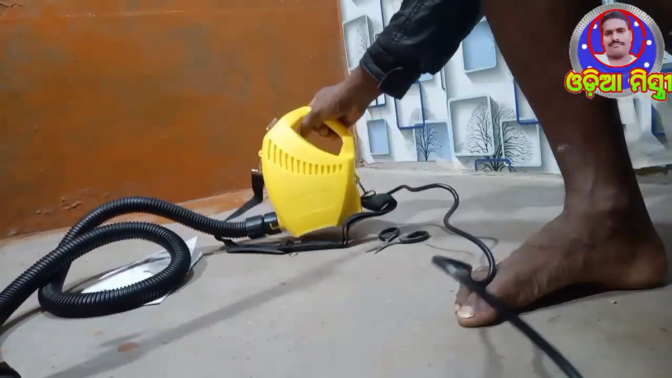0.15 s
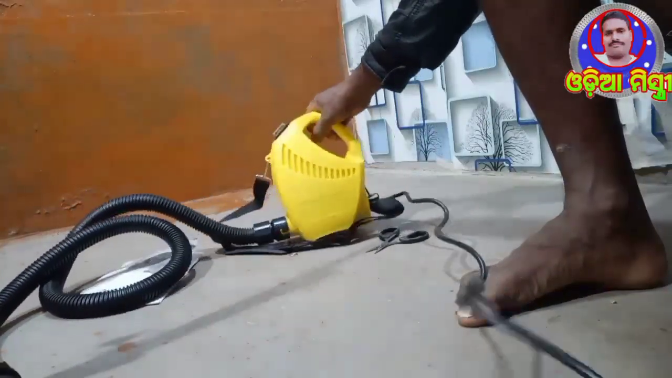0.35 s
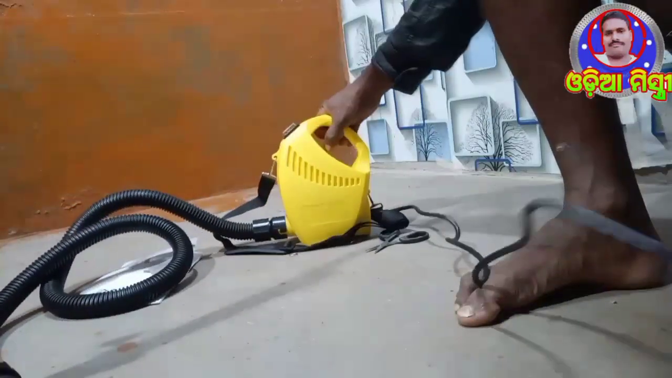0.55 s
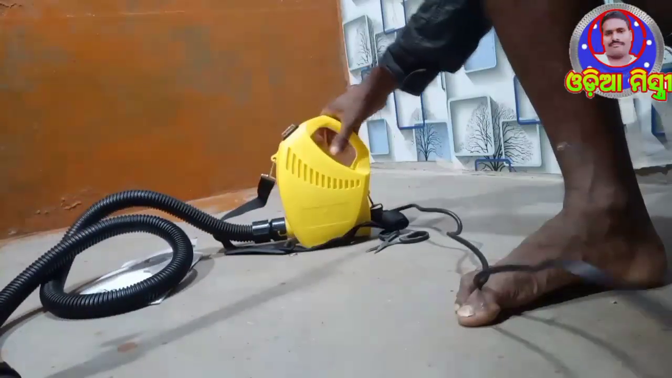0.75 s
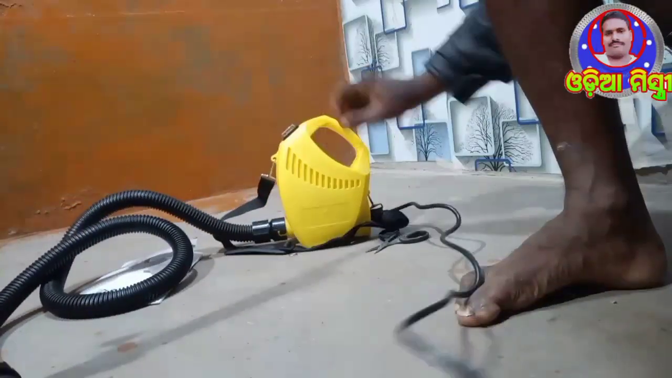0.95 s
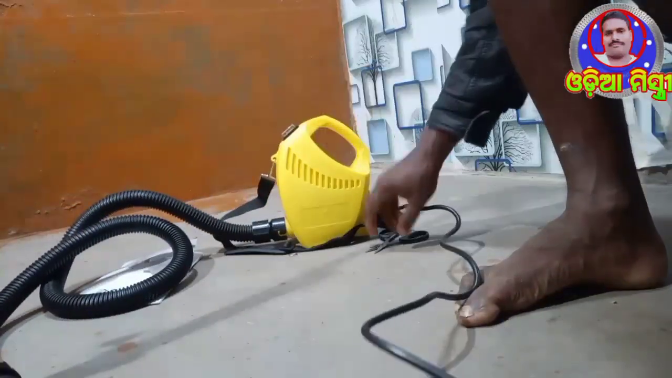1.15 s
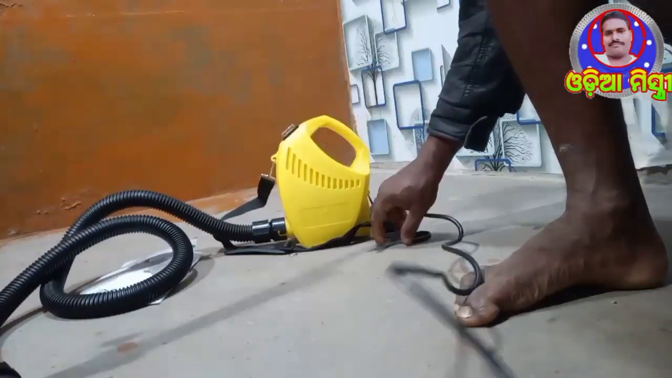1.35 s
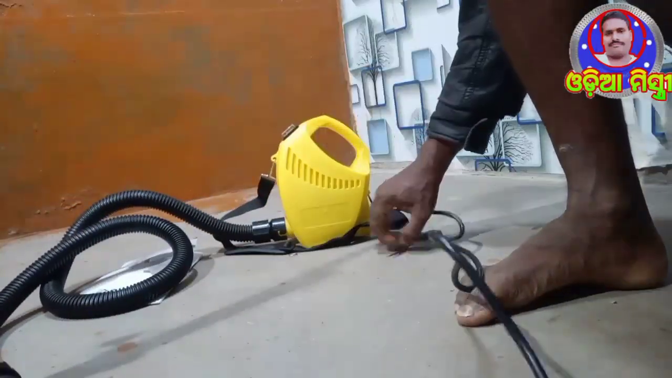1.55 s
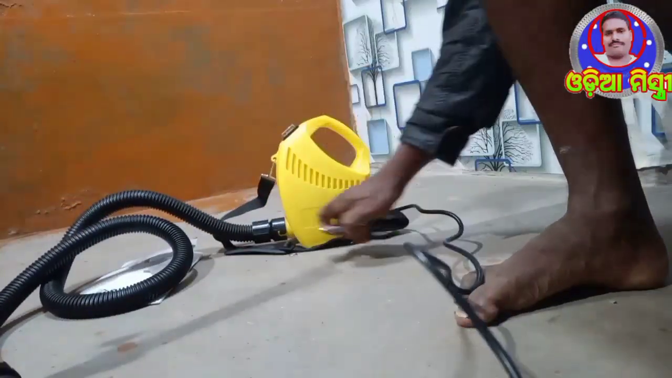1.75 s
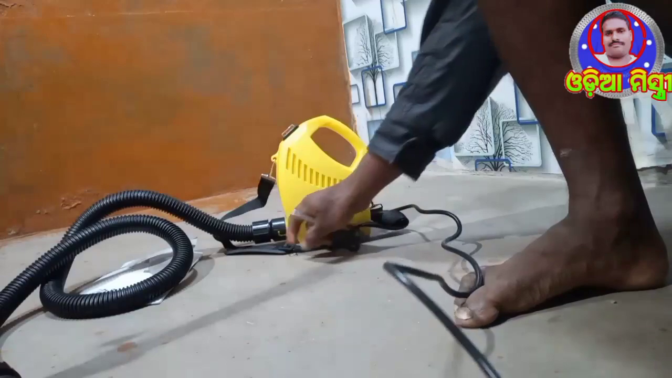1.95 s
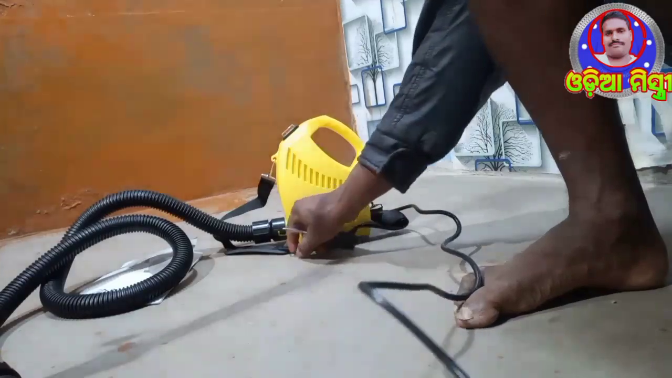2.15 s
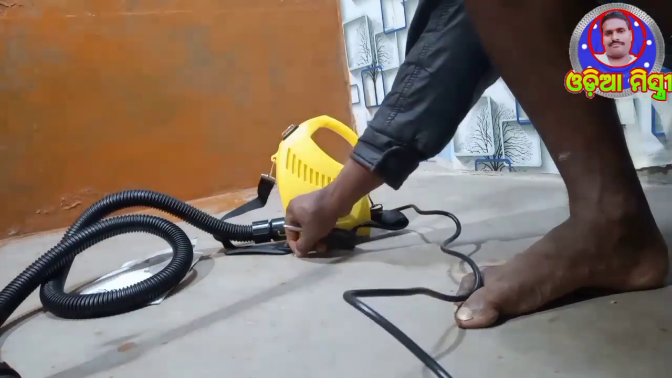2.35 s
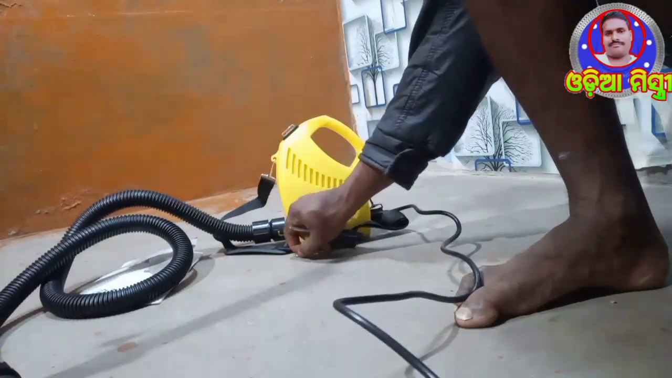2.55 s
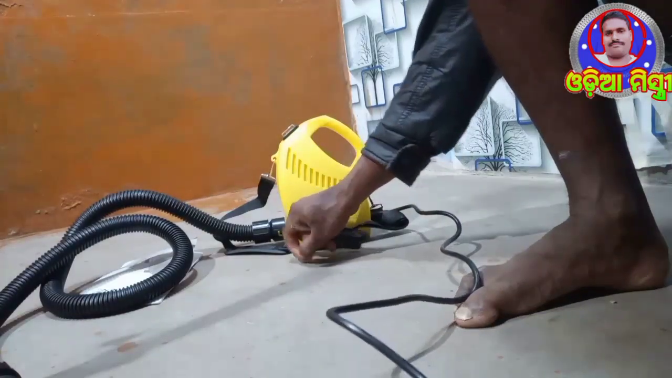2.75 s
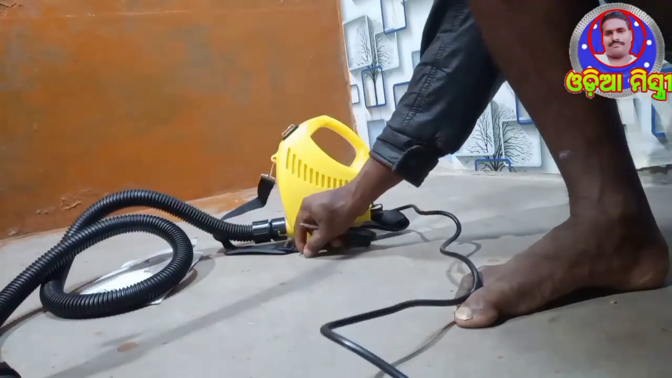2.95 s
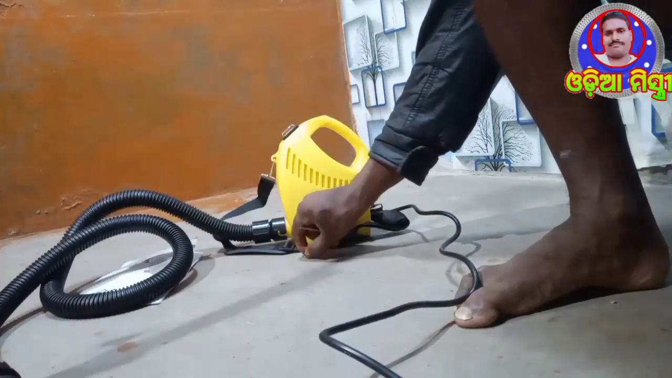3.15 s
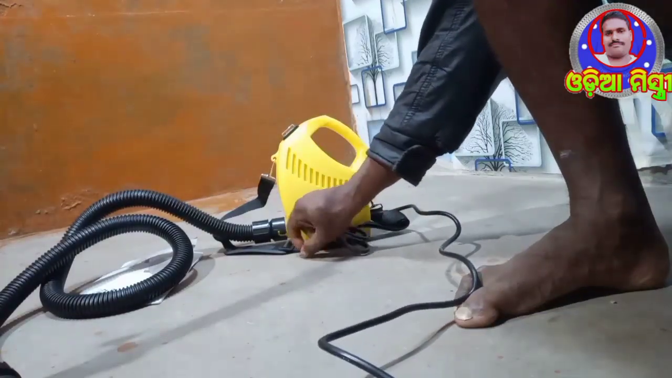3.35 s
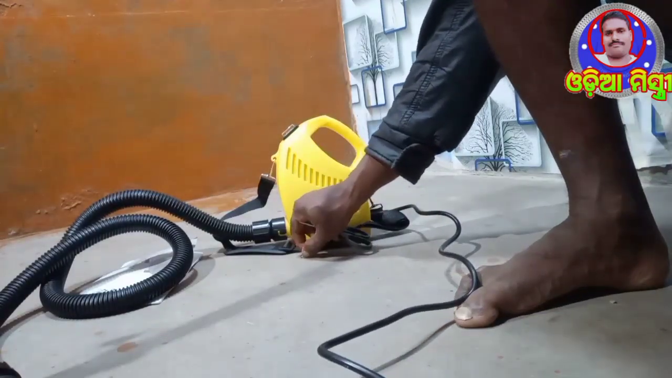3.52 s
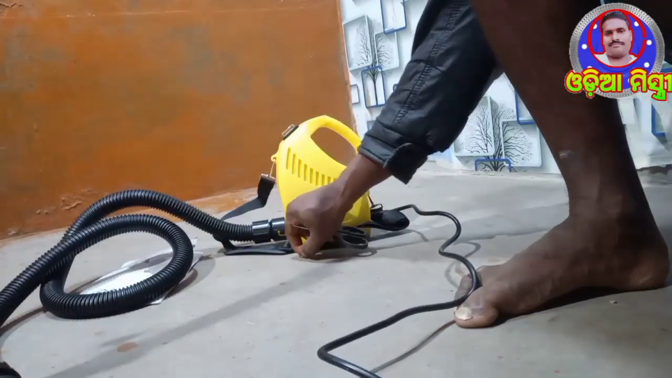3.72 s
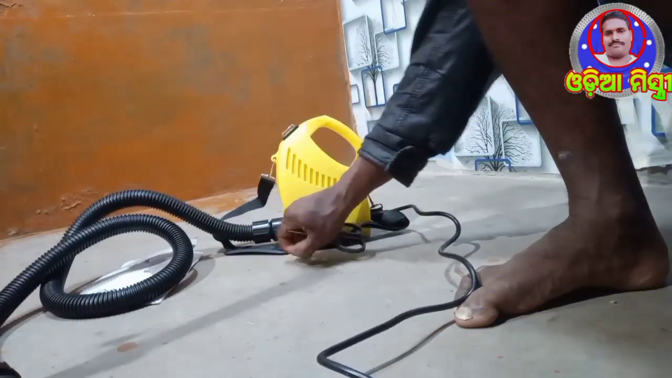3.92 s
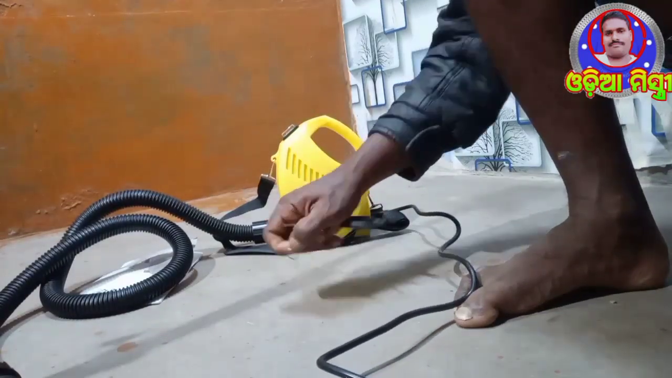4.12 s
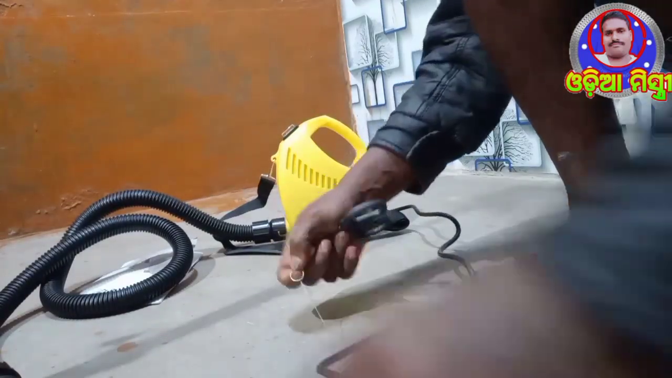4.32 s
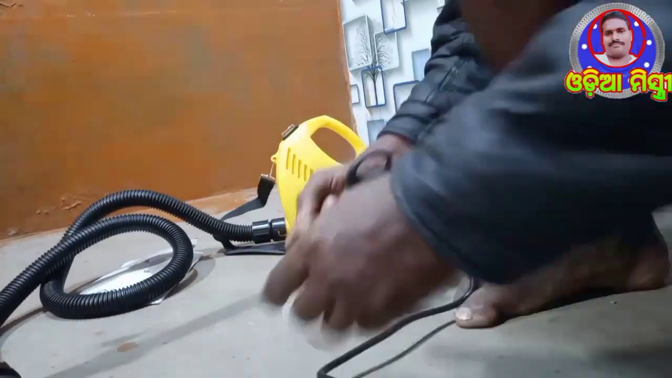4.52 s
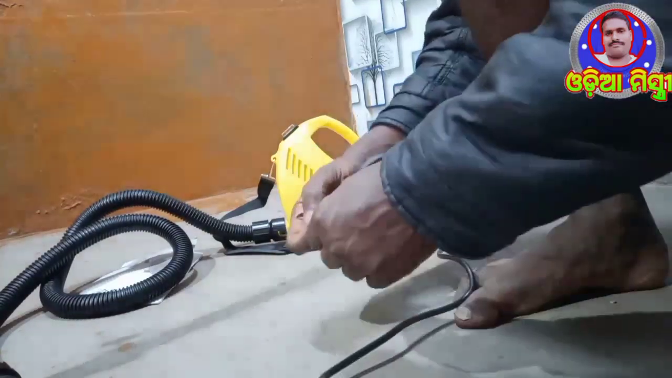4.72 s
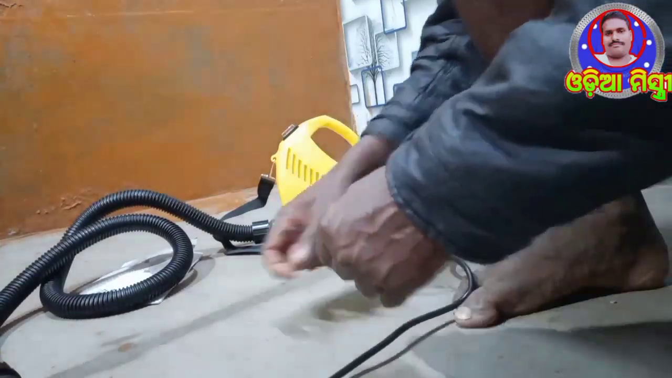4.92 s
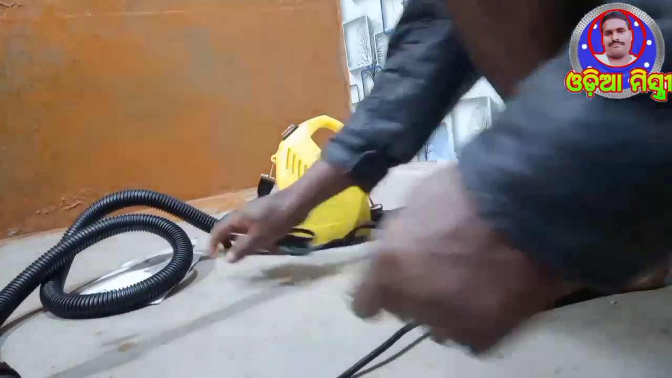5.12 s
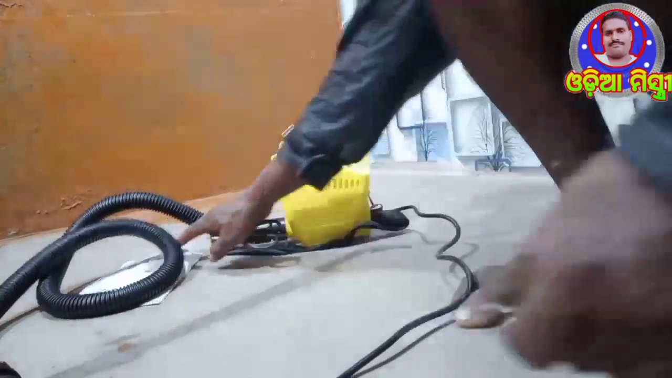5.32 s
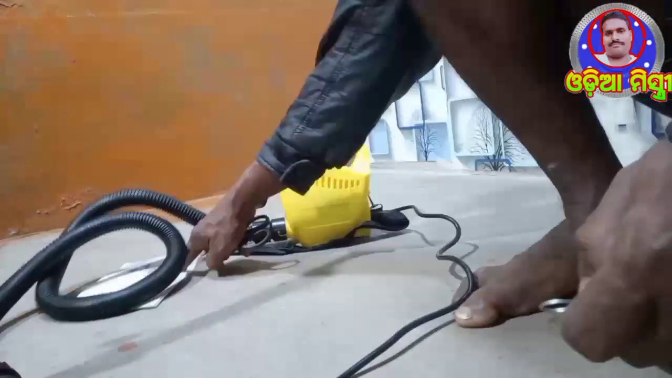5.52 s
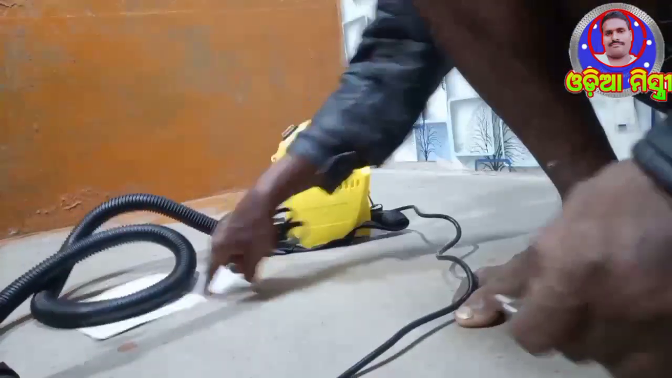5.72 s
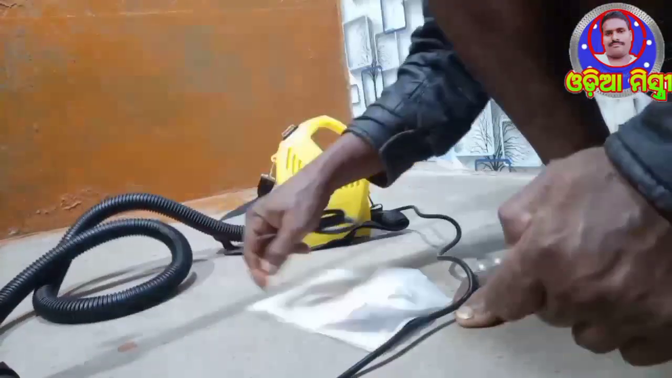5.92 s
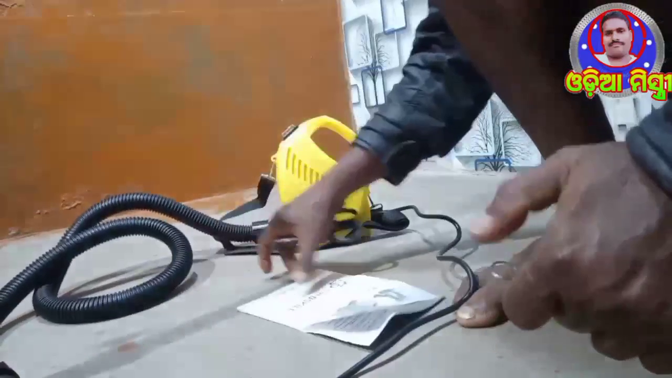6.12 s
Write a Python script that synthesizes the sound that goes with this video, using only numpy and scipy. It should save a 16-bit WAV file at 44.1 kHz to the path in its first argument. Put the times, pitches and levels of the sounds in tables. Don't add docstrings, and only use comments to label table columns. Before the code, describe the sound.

Close on the floor of a quiet, hard-walled room, a hollow plastic body lands with a loud slap and low ring, rocks once and skids briefly. Faint cable rubbing and small ticks follow. A part snaps loose with a sharp clattering click, sleeves rustle softly, and finally a sheet of paper slides under a palm with raspy hiss and soft thumps. Phone microphone, light room noise.

```python
import sys
import numpy as np
from scipy import signal
from scipy.io import wavfile
from scipy.ndimage import uniform_filter1d

SR = 44100
rng = np.random.default_rng(int(sys.argv[2]) if len(sys.argv) > 2 else 0)


def elevation(decibels):
    levels = np.asarray(decibels, float)
    return 10 ** (levels / 20)


def master(y):
    cut = np.clip(np.atleast_2d(y).T, -1, 1)
    pcm = np.round(cut * 32767)
    wavfile.write(sys.argv[1], SR, pcm.astype(np.int16))


N = 276507


def evened(x):
    return x / np.sqrt(np.mean(x ** 2) + 1e-20)


def read(points, hz):
    f, value = np.transpose(points)
    return np.interp(np.log(hz + 1), np.log(f + 1), value)


def along(rows):
    s, *columns = np.transpose(rows)
    return [np.interp(np.arange(N) / SR, s, c) for c in columns]


def during(rows):
    t = np.arange(N) / SR
    return elevation(np.array(along(rows))) * (t >= rows[0][0]) * (t <= rows[-1][0])


def add(mix, s, sound):
    part = mix[round(s * SR):][:len(sound)]
    part += sound[:len(part)]


def causal(points, size=2048):
    log_gain = np.log(elevation(read(points, abs(np.fft.fftfreq(2 * size, 1 / SR)))))
    return np.fft.ifft(np.exp(np.conj(signal.hilbert(log_gain)))).real[:size]


def coloured(x, points):
    return signal.oaconvolve(x, causal(points))[:len(x)]


def resonate(x, hz, width_hz):
    r = np.exp(-np.pi * width_hz / SR)
    return signal.lfilter([1 - r * r, 0, r * r - 1], [1, -2 * r * np.cos(2 * np.pi * hz / SR), r * r], x) / 2


def follow(x, hz, width_hz):
    turn = np.exp(2j * np.pi * np.cumsum(hz) / SR)
    r = np.exp(-np.pi * width_hz / SR)
    return 2 * (turn * signal.lfilter([1 - r], [1, -r], x / turn)).real


def swell(u, rise, fall):
    return -10 * np.where(u < 0, -u / np.maximum(rise, 1e-3), u / np.maximum(fall, 1e-3))


def strokes(rows, extra_db=0):
    s, db, rise, fall = np.transpose(rows)[:4, :, None]
    at = np.arange(0, N + 64, 64)
    level_db = db + extra_db + swell(at / SR - s, rise, fall)
    return np.interp(np.arange(N), at, np.linalg.norm(elevation(level_db), axis=0))


def dying_tones(rows):
    t, out = np.arange(2 * SR // 3) / SR, np.zeros(N)
    for s, db, hz, t60 in rows:
        onset = 1 - np.exp(-t * hz / 0.19)
        add(out, s, elevation(db - 60 * t / t60) * np.sin(2 * np.pi * hz * t) * onset)
    return out


# f/Hz, density/dB per Hz
AIR = [(29, -47), (50, -16.5), (108, -4.5), (154, 0.5), (592, -10.5), (735, -10), (1220, -18.5),
       (2620, -15), (3950, -16.5), (4900, -32), (6380, -33), (9140, -34), (15500, -38.5)]
# peak t/s, peak level/dB, rise/s, fall/s
SHUDDERS = [(0.0, -73, 0.088, 0.13), (.5, -55, 0.025, 0.2), (.63, -58, 0.12, 0.096), (.77, -64.5, .08, .03),
            (1.17, -77, .04, .05), (.98, -70, 0.094, 0.15), (1.66, -75.5, 0.056, 0.085),
            (2.06, -80.5, 0.055, 0.071), (2.46, -76.5, 0.098, 0.093), (3.05, -67, 0.22, 0.065),
            (3.28, -76, .07, 0.37), (4.42, -74.5, 0.36, 0.38), (5.55, -65.5, 0.15, 0.34),
            (6.03, -53.5, 0.11, 0.11)]


def air():
    hush = coloured(rng.standard_normal(N), AIR)
    drone = resonate(resonate(rng.standard_normal(N), 73, 11), 73, 13)
    return elevation(-73.5) * evened(hush) + (elevation(-99) + strokes(SHUDDERS)) * evened(drone)


# f/Hz, t60/s
WALLS = [(120, 0.85), (330, 0.63), (870, 0.28), (2300, 0.31), (5000, 0.08), (9000, 0.14), (15000, 0.062)]


def room(x):
    taps = np.zeros(SR)
    at = np.arange(200, SR - 20, 20)
    taps[at + rng.integers(0, 20, len(at))] = rng.choice([-1., 1.], len(at))
    hz, t, z = signal.stft(taps, SR, nperseg=512)
    decay = elevation(-60 * t / read(WALLS, hz)[:, None])
    tail = signal.istft(z * decay, SR, nperseg=512)[1][200:]
    delayed = np.pad(tail / np.linalg.norm(tail), (120, 0))
    return signal.fftconvolve(x, delayed)[:N]


# f/Hz, gain/dB
MIC = [(30, -43.5), (95, -22), (150, 4), (1200, 7), (3500, 1), (4300, -4), (5800, -5.5), (7500, -6.5),
       (9200, -0.5), (11000, -11), (15000, -16.5)]


def heard(x):
    return coloured(x, MIC)


def puff():
    out, u = np.zeros(N), np.arange(SR // 8) / SR / 0.0065
    add(out, 0.441, elevation(-40) * u * (2 - u) * np.exp(-u))
    return out


# t/s, upper tone level/dB, lower tone level/dB
SING = [
    (4.898, -100, -97.5),
    (4.93, -87.5, -72),
    (4.97, -87, -76.5),
    (5.004, -66.5, -78.5),
    (5.032, -83, -70),
    (5.058, -67, -96),
    (5.104, -84, -82),
    (5.138, -74.5, -81.5),
    (5.17, -94.5, -92),
]


def singing():
    t = np.arange(N) / SR
    on = (t > SING[0][0]) & (t < SING[-1][0])
    waver = 1 + 0.002 * evened(uniform_filter1d(rng.standard_normal((2, N)), size=1500))
    out = np.zeros(N)
    for db, hz, w in zip(along(SING), (1070, 430), waver):
        out += elevation(db + 6) * on * np.sin(2 * np.pi * hz * np.cumsum(w) / SR)
    return out


# t/s, peak level/dB, f/Hz, t60/s
BUMPS = [(2.987, -39, 370, 0.035), (4.232, -60.5, 145, 0.083), (5.457, -41, 170.6, 0.11),
         (5.534, -40.5, 160.3, 0.11), (5.596, -46, 165, 0.067), (5.665, -40.5, 164, 0.056),
         (5.715, -41.5, 175, 0.083), (5.825, -45, 175, .12), (5.86, -41, 180, 0.16),
         (5.775, -37, 175, 0.088), (5.919, -49, 165, 0.088), (6.066, -46, 149, .12),
         (6.155, -40, 148, 0.14), (6.215, -51, 160, .12)]


def bumps():
    return dying_tones(BUMPS)


# t/s, peak level/dB, f/Hz, t60/s
PINGS = [(.02, -67, 773, 0.18), (.165, -62.5, 746.5, 0.1), (1.384, -79, 1067, 0.36),
         (1.885, -70.5, 792, 0.27), (2.69, -49.5, 2400, 0.05), (2.69, -54.5, 3800, 0.067),
         (2.81, -54, 7100, 0.12), (3.2, -68, 1088, 0.35), (3.417, -69, 9090, 0.088),
         (4.25, -69.5, 770, 0.28), (5.022, -62.5, 2400, 0.053), (5.05, -70, 2340, .06),
         (5.019, -70.5, 2550, 0.06), (5.021, -70, 1890, 0.051), (6.156, -26, 3350, 0.026),
         (6.163, -16, 2850, 0.0079), (0.894, -48, 2960, 0.19), (.908, -50.5, 2335, 0.15),
         (2.988, -55, 124.8, 0.47), (.445, -26.5, 513, .24), (.444, -32, 667, .2), (0.72, -48.5, 269, 1.24),
         (.75, -39.5, 244, 0.16), (.82, -44, 420, 0.57), (.749, -43, 1430, 0.2), (.749, -45, 1306, 0.18),
         (.749, -43, 768, 0.22), (.749, -48, 1162, 0.22), (.75, -40.5, 330, 0.31), (2.495, -68, 2900, .08),
         (2.8, -56, 3300, .1), (2.1, -60, 2700, .08), (.75, -27.5, 318, .12), (.815, -37, 330, 0.089),
         (0.751, -44, 1080, 0.18), (2.69, -65, 4000, .1)]


def pings():
    return dying_tones(PINGS)


def patches(x, patchy_db):
    _, _, z = signal.stft(x, nperseg=256)
    field = uniform_filter1d(rng.standard_normal(z.shape), size=4, axis=0)
    field = uniform_filter1d(field, size=10, axis=1)
    return signal.istft(z * elevation(patchy_db * evened(field)), nperseg=256)[1][:N]


def stick_slip():
    slips = elevation(4.0 * np.minimum(rng.exponential(1, N), 2.6)) * rng.standard_normal(N)
    slips *= elevation(0.6 * evened(uniform_filter1d(rng.standard_normal(N), size=130)))
    return patches(slips + 0.36 * room(slips), patchy_db=1.5)


def shaken(slips, spectrum):
    return evened(heard(coloured(slips, spectrum)))


# peak t/s, peak level/dB, rise/s, fall/s
LEANS = [(0.0, -58.5, .05, 0.052), (.35, -70.5, 0.022, 0.036), (1.4, -74, 0.1, 0.096),
         (2.35, -69.5, 0.11, 0.17), (2.72, -71, 0.022, 0.33), (3.01, -63, 0.015, 0.079),
         (3.095, -51.5, 0.084, 0.067), (3.19, -64.5, 0.042, 0.2), (3.6, -77.5, 0.2, 0.058),
         (4.25, -69, 0.032, 0.14), (5.13, -76, 0.064, 0.081), (5.48, -57, 0.023, 0.37),
         (6.168, -44.5, 0.0092, 0.025)]


def leaning(body, rumble):
    return strokes(LEANS) * (rumble + elevation(-9) * body)


# peak t/s, peak level/dB, rise/s, fall/s, f/Hz
SCUFFS = [(0.78, -36, 0.0024, 0.0041, 1550), (1.59, -68.5, 0.008, 0.06, 2000),
          (1.655, -65.5, .015, 0.038, 4300), (1.89, -61, .02, 0.039, 2450),
          (1.875, -65, 0.014, 0.018, 3500), (.835, -72, .003, 0.022, 14500),
          (1.655, -62, 0.012, 0.032, 8900), (1.66, -65.5, .01, 0.032, 13500),
          (1.8, -62, 0.019, 0.037, 3430), (1.875, -72, 0.016, 0.027, 9100),
          (1.901, -55, 0.021, 0.035, 3250), (2.405, -78, .004, 0.018, 10900),
          (2.405, -85, 0.0025, .02, 2160), (2.505, -70, 0.0097, 0.01, 2620), (2.695, -67, .003, 0.02, 7700),
          (2.73, -64.5, .02, 0.022, 2700), (2.785, -73.5, .006, 0.048, 11000),
          (2.812, -65, .005, 0.031, 13500), (2.815, -62.5, 0.0099, 0.026, 7100),
          (2.825, -66, 0.017, .03, 760), (3.01, -45.5, .003, .05, 4250), (3.008, -50, .004, 0.013, 900),
          (3.345, -69.5, .01, 0.024, 7200), (6.166, -31.5, 0.0073, 0.016, 3060),
          (5.93, -44, .06, .04, 4150), (5.89, -40, 0.03, 0.033, 3600), (5.76, -53.5, 0.066, 0.11, 2080),
          (2.4, -60, .03, 0.029, 4100), (2.1, -62, 0.009, 0.036, 3700), (6.165, -43, 0.0056, 0.018, 730),
          (6.163, -34.5, .004, 0.0067, 8500), (4.17, -68, 0.011, 0.033, 7900),
          (4.215, -62.5, 0.0096, 0.0081, 2770), (4.23, -67.5, 0.0089, 0.024, 9000),
          (4.235, -65, 0.022, 0.032, 13700)]


def scuffs(slips):
    out, u = np.zeros(N), np.arange(-SR // 8, SR // 8) / SR
    for s, db, rise, fall, hz in SCUFFS:
        part = slips[round(s * SR) - SR // 8:][:len(u)]
        width_hz = hz / 3.6
        part = evened(resonate(resonate(part, hz, width_hz), hz, width_hz))
        add(out, s + u[0], part * elevation(db + swell(u, rise, fall))[:len(part)])
    return out


# f/Hz, density/dB per Hz
RUB = [(900, -28), (1400, -4), (2000, 2), (3000, 5), (4200, 6.5), (5500, -4.5), (7000, -29.5)]
# peak t/s, peak level/dB, rise/s, fall/s, grit level/dB re peak
HAND_STROKES = [(0.0, -69, .05, 0.18, -13.5), (.13, -65.5, 0.061, 0.24, -14), (.35, -68, 0.057, 0.025, -17),
                (.41, -72.5, 0.021, 0.13, -27.5), (0.621, -66, 0.052, 0.37, -14.5),
                (0.831, -73.5, 0.001, 0.032, 15), (1.11, -61, 0.046, 0.11, -6),
                (1.21, -63.5, 0.13, 0.044, -10.5), (1.59, -68, 0.013, 0.074, -31),
                (1.66, -66.5, 0.054, .07, -1.5), (1.79, -70.5, 0.075, 0.056, -3), (1.9, -63, 0.031, 0.043, -5.5),
                (2.121, -63, 0.15, 0.53, -10.5), (2.168, -58, 0.0091, 0.14, -15.5),
                (2.52, -67.5, 0.22, 0.048, -14), (2.648, -68, .02, 0.037, -13), (2.697, -61, 0.013, 0.08, -10),
                (2.82, -56.5, 0.029, 0.082, -12.5), (2.933, -69.5, .08, 0.026, -8.5),
                (2.997, -37, 0.0023, 0.052, -10), (3.08, -45, .005, 0.025, -16), (3.11, -54.5, 0.084, 0.1, -9),
                (3.337, -60, 0.026, 0.075, -13), (3.56, -67, 0.039, 0.043, -11.5), (3.7, -75.5, .035, .04, -10),
                (3.84, -76, 0.031, 0.059, -9),
                (1.38, -72.5, 0.26, 0.16, -13), (4.162, -54.5, 0.0061, 0.072, -8.5),
           (4.247, -62, 0.11, 0.031, -7), (4.48, -62.5, 0.13, 0.22, -9), (4.701, -63, 0.15, 0.093, -10),
           (4.817, -66.5, 0.18, 0.021, -20.5), (5.018, -87, 0.0024, 0.045, -31),
           (5.17, -72, 0.026, 0.36, -9), (5.359, -71.5, 0.22, 0.029, -8.5), (5.463, -60, 0.043, 1, -9.5),
           (5.64, -71, 0.51, 0.018, -9)]


def hand_strokes(slips, grit, body, rumble):
    hands = np.array(HAND_STROKES)
    rub = shaken(slips, RUB) + elevation(-5) * body + elevation(-10) * rumble
    scrape = evened(grit + 0.36 * resonate(grit, 8800, 3500))
    return strokes(hands) * rub + strokes(hands, hands[:, -1:]) * scrape


# f/Hz, density/dB per Hz
PAPER = [(600, -55), (1100, -11), (1550, -6.5), (1880, -7), (2250, 1.5), (3700, 5.5), (4500, 8.5),
         (5800, 5.5), (7000, -8)]
# t/s, then four pitches f/Hz
SHEET = [
    (5.66, 1900, 2760, 3300, 4200),
    (5.78, 1900, 2600, 3520, 4160),
    (5.86, 1810, 2530, 3470, 4150),
    (5.94, 1880, 2600, 3600, 4160),
    (5.99, 1750, 3180, 3700, 4170),
    (6.03, 1880, 3250, 3810, 4070),
    (6.07, 1830, 2980, 3600, 4200),
    (6.13, 1650, 2720, 3320, 3830),
    (6.27, 1590, 2430, 3240, 3850),
]
# t/s, speed level/dB, weight level/dB
DRAG = [(5.655, -58, -88), (5.672, -49.5, -72), (5.705, -58, -65), (5.72, -44, -59), (5.75, -38.5, -56),
        (5.78, -37.5, -54), (5.83, -34, -49), (5.87, -33, -48.5), (5.95, -30, -52), (5.99, -31, -51.5),
        (6.03, -29.5, -49.5), (6.06, -32, -49.5), (6.085, -34.5, -50), (6.105, -37.5, -51),
        (6.13, -34.5, -61), (6.15, -36.5, -55), (6.198, -39, -48.5), (6.206, -42.5, -55.5),
        (6.27, -51, -59)]


def sheet_drag(slips, grit, body, rumble):
    paper = shaken(slips, PAPER)
    modes = zip((2.3, 1.5, 1.5, 1.3), along(SHEET))
    paper = evened(paper + sum(g * follow(paper, hz, 160) for g, hz in modes))
    speed, weight = during(DRAG)
    fast_db = -32
    grit_gain = elevation(fast_db - 0.5) * (speed / elevation(fast_db)) ** 1.59
    hum = evened(resonate(body, 416.3, 9.3))
    return speed * paper + grit_gain * grit + weight * (rumble + elevation(-1) * body + elevation(-3.5) * hum)


# f/Hz, density/dB per Hz
SLIDE = [(500, -54), (1000, -7), (1450, -0.5), (1900, -2.5), (2350, -4), (2700, -4.5), (3050, -7.5),
         (3900, -2), (4800, -21.5)]
# f/Hz, width/Hz, level/dB
SKID_RINGS = [(1064, 55, 1), (1462, 35, -0.5)]
# t/s, speed level/dB, weight level/dB
SKID = [(.6, -83, -100), (.74, -68, -100), (.79, -46.5, -90), (.82, -53, -60), (.85, -52, -54),
        (.875, -48, -50.5), (.896, -43.5, -54), (.918, -47.5, -56), (.96, -56.5, -62), (.986, -61, -62),
        (1.05, -81, -92)]


def skid(slips, body, rumble):
    slide = shaken(slips, SLIDE)
    rings = sum(elevation(db) * evened(resonate(slide, hz, w)) / 2 for hz, w, db in SKID_RINGS)
    speed, weight = during(SKID)
    return speed * evened(slide + rings) + weight * (body + elevation(-8) * rumble)


# f/Hz, density/dB per Hz
GRIT = [(4500, -29), (6500, -3.5), (10000, -2.5), (16000, 0)]
# f/Hz, density/dB per Hz
BODY = [(250, -23.5), (380, 5.5), (800, 6), (1300, -4), (1900, -31.5)]
# f/Hz, density/dB per Hz
RUMBLE = [(70, -23), (110, 10), (165, 0), (230, -5), (320, -3.5), (430, -44)]


def rubbing():
    slips = stick_slip()
    grit, body, rumble = [shaken(slips, s) for s in (GRIT, BODY, RUMBLE)]
    out = leaning(body, rumble) + scuffs(slips)
    out += hand_strokes(slips, grit, body, rumble)
    out += sheet_drag(slips, grit, body, rumble)
    return out + skid(slips, body, rumble)


def tick(db, low_db, high_db, hz, low_hz, length):
    t = np.arange(SR // 8) / SR
    rattle = 0.21 * rng.standard_normal(len(t)) * np.exp(-t / max(length, .001))
    rattle += np.exp(-t / .00008)
    parts = [resonate(resonate(rattle, f, w), f, w) for f, w in ((hz, 2700), (low_hz, 1500))]
    high = resonate(resonate(rattle, 10000, 8700), 10000, 8700)
    parts.append(resonate(high, 18000, 9000))
    return elevation(db) * sum(elevation(g) * p / abs(p).max() for g, p in zip((0, low_db, high_db), parts))


TICK_LAG_S = .0018
# t/s, peak level/dB, high part level/dB,
# centre f/Hz
TICKS = [(0.151, -54, -21, 3720), (0.4402, -28.5, -10, 2980), (0.4455, -32, -6, 3500),
         (0.4556, -30.5, -19, 3170), (0.737, -45, -43, 1500), (0.7463, -34, -36, 1760),
         (0.8272, -44.5, 9, 6000), (1.576, -61, -17, 2020), (1.633, -61.5, 11, 8960),
         (1.647, -49, 4.5, 3980), (1.7888, -46, -32, 3900), (1.8883, -43.5, -12, 3040),
         (2.158, -39.5, -22, 3300), (2.162, -51, -20, 3920), (2.401, -57.5, 2, 1980),
         (2.4388, -50.5, -3, 4200), (2.5, -55, -25, 2590), (2.6885, -43.5, -34, 2700),
         (2.775, -49.5, -7, 3800), (2.804, -46, -5, 7050), (2.8072, -49.5, -23, 2210),
         (3.223, -48, 4, 3460), (3.331, -49.5, 5.5, 2100), (3.409, -49, -17.5, 3820),
         (3.5324, -60, -34, 2650), (3.6955, -54, -21.5, 3810), (3.787, -70.5, 7.5, 4500),
         (3.8287, -52.5, -2, 6940), (4.124, -57, -7, 6800), (4.15, -50, -4.5, 3000),
         (4.158, -45.5, -3.5, 2540), (4.6896, -49, -30, 2340), (5.664, -46, -25, 2600),
         (5.6672, -33, 3, 2200), (5.679, -39, 0, 2400), (5.7125, -41, 10, 2960), (5.781, -28, -6, 3300),
         (5.817, -34, -6, 3300), (6.027, -23.5, -1, 3540)]


def ticks():
    out = np.zeros(N)
    for s, db, high_db, hz in TICKS:
        length_s = 0.0043 * elevation(db + 46.5)
        add(out, s + TICK_LAG_S, tick(db, -22, high_db, hz, 877, length_s))
    return out


# t/s, peak level/dB, low part level/dB, high part level/dB, rattle length/s
CLATTER = [(2.955, -40, -11.5, -24, 0.0023), (2.958, -46, -7.5, -15, .002), (2.969, -41.5, -13, -10, .003),
           (2.972, -30, -14.5, -2.5, 0.018), (2.977, -34.5, -10.5, -13, .005), (2.983, -38, -5, 11, 0.008),
           (2.988, -42, -1, 19.5, 0.02), (2.9896, -13, -20, -34, 0.00084), (2.993, -42.5, -0.5, -19, 0.011),
           (3.0064, -27.5, -4.5, -19, 0.002), (3.0655, -27, -9.5, -25, 0.001),
           (3.073, -34, -12.5, -4, 0.013), (3.097, -36, -8, -15, 0.011)]


def clatter():
    out = np.zeros(N)
    for s, db, low_db, high_db, length in CLATTER:
        add(out, s + TICK_LAG_S, tick(db, low_db, high_db, 2600, 990, length))
    return out


# f/Hz, level/dB, t60/s
SHELL = [(191.6, -11, 0.33), (251.3, 2, .24), (271, -13.5, 0.55), (312, -13, .3), (819, -14, .2),
         (415.5, -17.5, 0.48), (428, -12.5, 0.43), (487, -15, .17), (517, -14.5, 0.2), (559, -12, 0.13),
         (639, -11.5, .14), (672.6, -9, 0.082), (774, -7, 0.21), (875, -16.5, 0.1)]
# f/Hz, gain/dB
CONTACT = [(90, -38), (200, -5.5), (420, -5.5), (720, 1.5), (950, -11.5), (1500, -10.5), (2500, -12),
           (4500, -10.5), (6000, -30.5), (9000, -28), (15000, -34)]
# t/s, level/dB, slap level/dB re blow, dullness/dB per octave, slap length/s
BLOWS = [(0.4414, -16, 0, 1, 0.016), (0.4435, -9, -1.5, 3.5, 0.037), (0.4487, -31, -0.5, -6, .035),
         (0.452, -28.5, 8, 3, 0.044), (0.4565, -13.5, -3, 2.5, 0.031), (0.467, -25, -10, 1, 0.038),
         (0.478, -27, -8, 3, 0.038), (0.487, -23, -11, -2.5, .035), (0.501, -26, -13, -1, .04),
         (0.7476, -26, -1, 2.5, 0.0099), (0.7495, -14, -13, 5, 0.016), (.758, -30, -5, -4, .015),
         (0.763, -24, -27, 18, .035), (0.818, -25.5, -30, 3, .035)]


def sprayer():
    t, shell, slap = np.arange(SR // 2) / SR, np.zeros(N), np.zeros(N)
    give = 1 - np.exp(-t / 0.00045)
    for s, db, slap_db, dull_db, length in BLOWS:
        ring = np.zeros(len(t))
        for hz, mode_db, t60 in SHELL:
            level_db = mode_db - dull_db * np.log2(hz / 250) - 60 * t / t60
            ring += elevation(level_db) * np.sin(2 * np.pi * hz * t)
        add(shell, s, -elevation(db - 10.0) * ring * give)
        burst = rng.standard_normal(len(t)) * np.exp(-t / max(length, .003))
        add(slap, s, elevation(db + slap_db) * burst)
    return shell, coloured(slap, CONTACT)


def scene():
    shell, slap = sprayer()
    click = ticks() + clatter()
    bump = bumps() + pings()
    wet = room(elevation(-15) * shell + elevation(-9.0) * slap + elevation(-8.0) * click + elevation(-13.0) * bump)
    knocks = heard(shell + slap + click + bump + wet)
    return (knocks + rubbing() + singing() + puff() + air())[None]


def roll_off(x):
    return signal.sosfilt(signal.butter(12, 16440, fs=SR, output="sos"), x)


def record(dry):
    low_pass = signal.firwin(511, 15680, window=("kaiser", 9), fs=SR)
    limited = signal.oaconvolve(dry, low_pass[None], "same")
    return roll_off(limited)


dry = scene()
out = record(dry)
master(out)
```